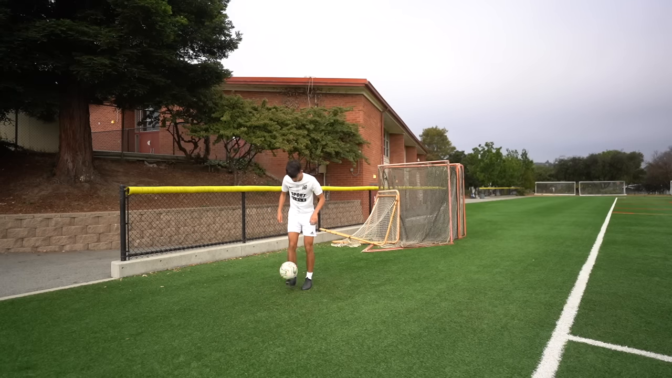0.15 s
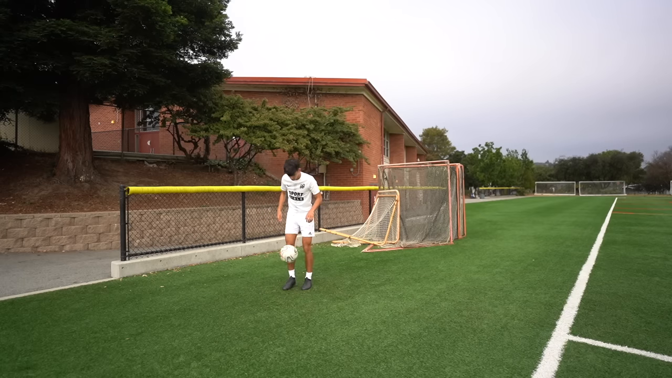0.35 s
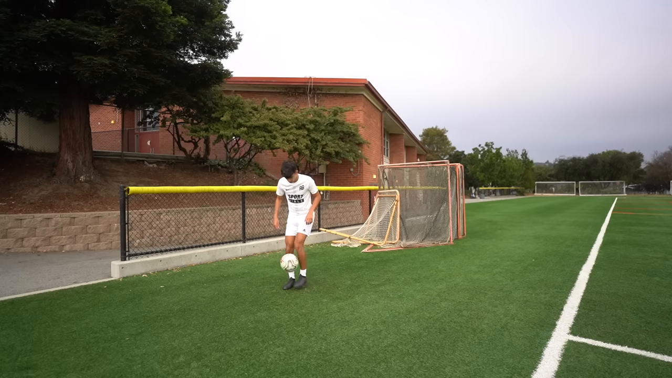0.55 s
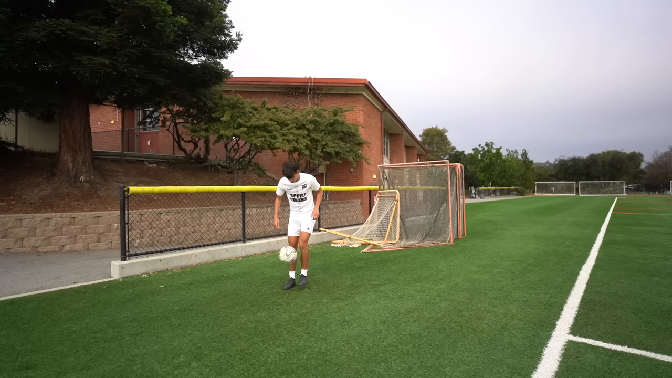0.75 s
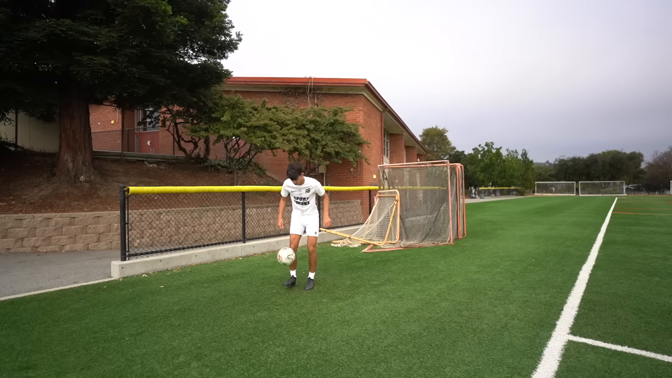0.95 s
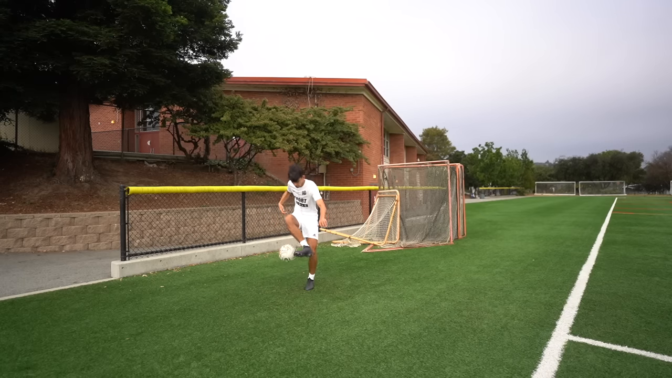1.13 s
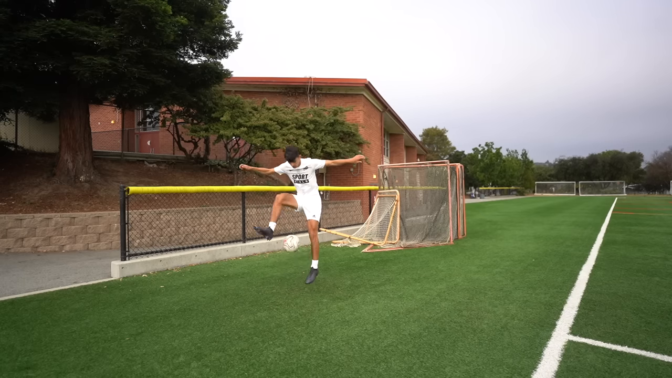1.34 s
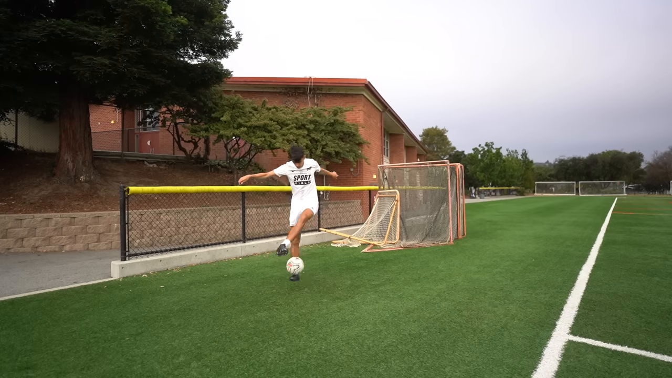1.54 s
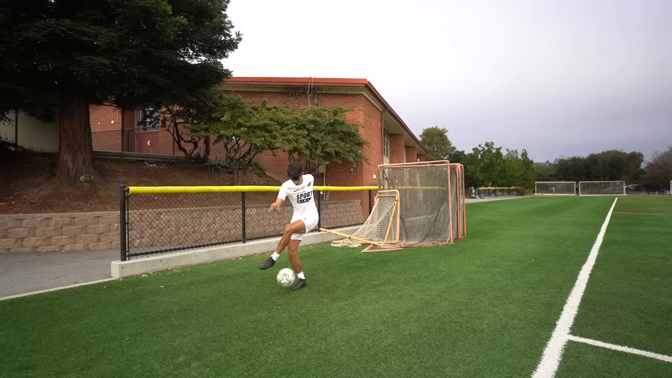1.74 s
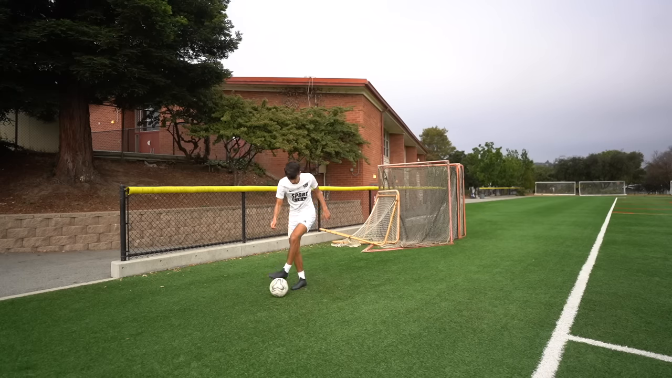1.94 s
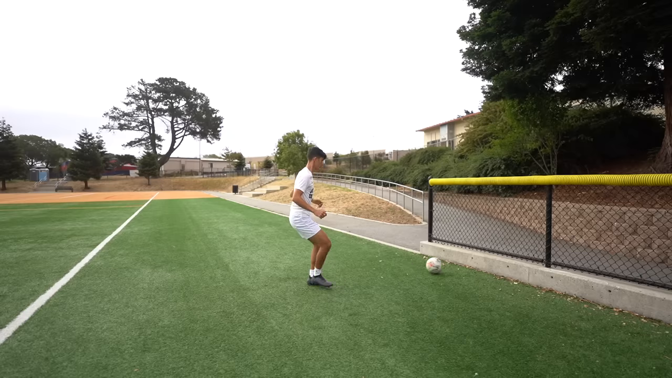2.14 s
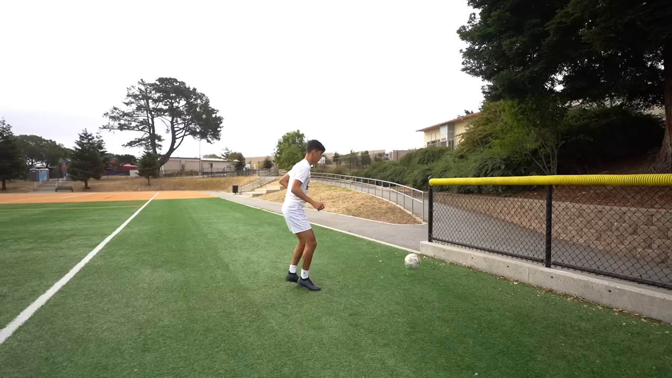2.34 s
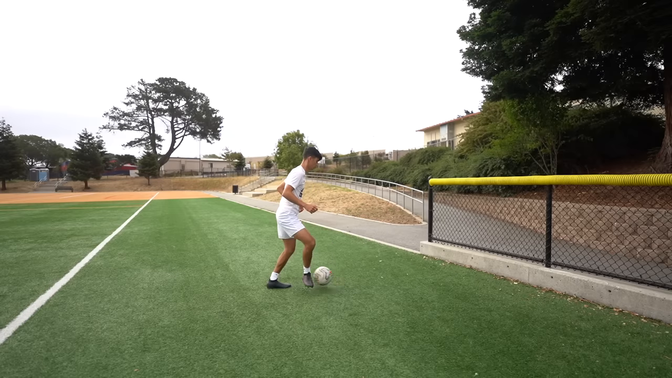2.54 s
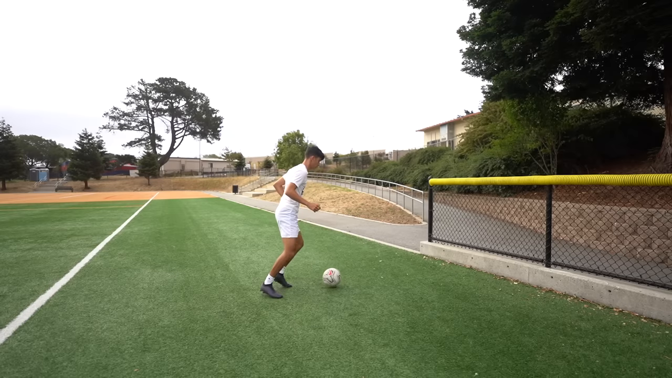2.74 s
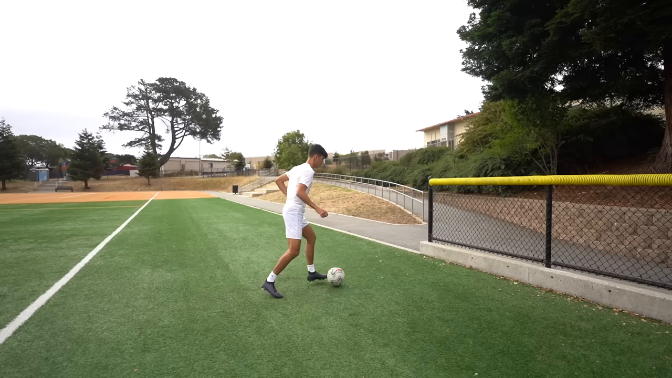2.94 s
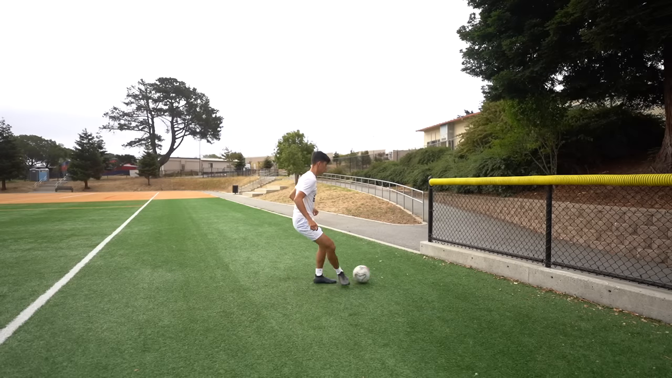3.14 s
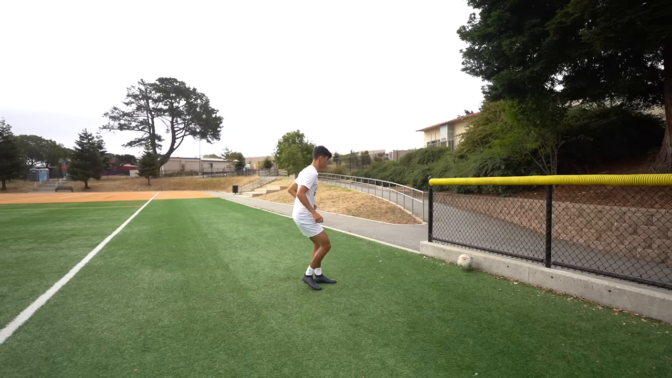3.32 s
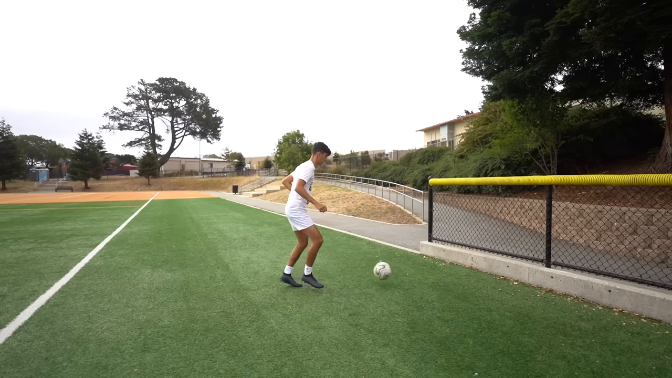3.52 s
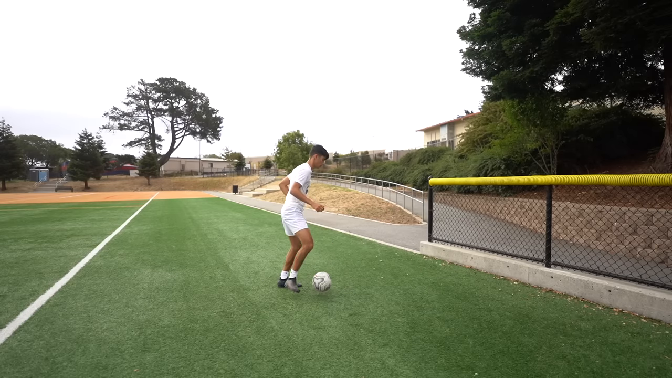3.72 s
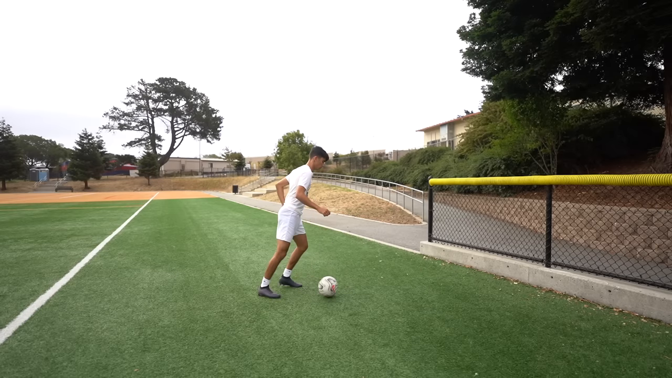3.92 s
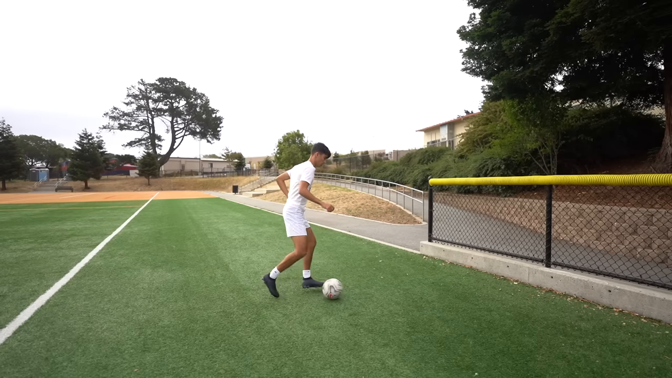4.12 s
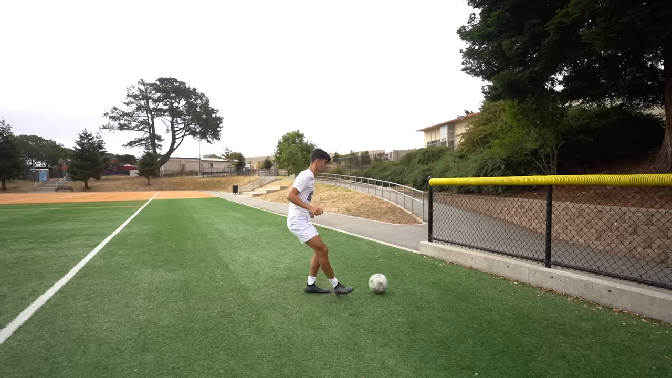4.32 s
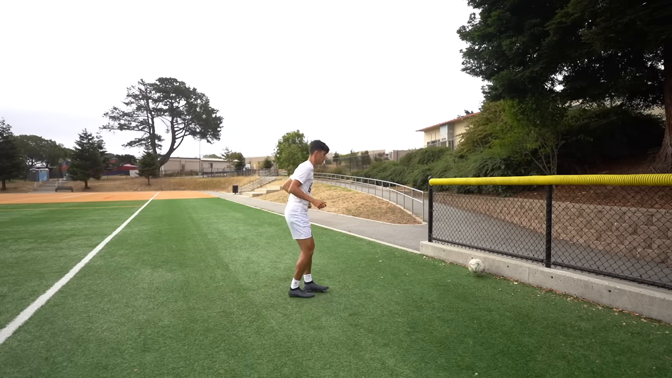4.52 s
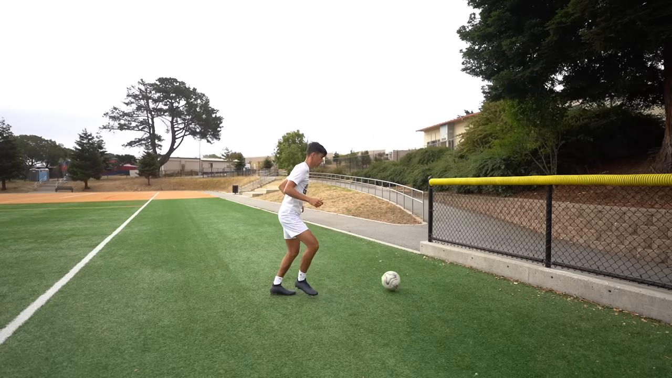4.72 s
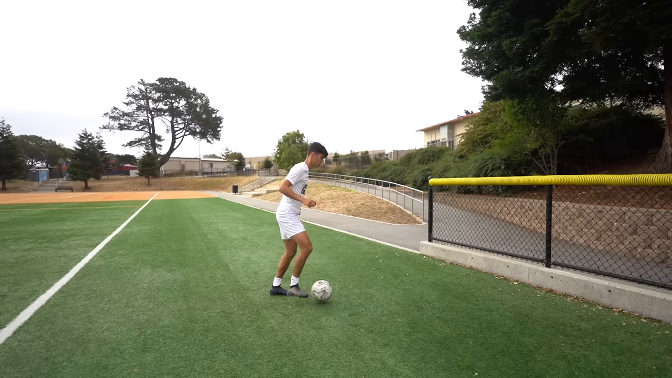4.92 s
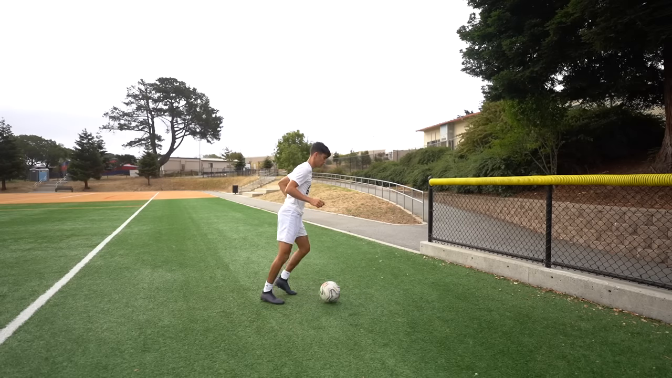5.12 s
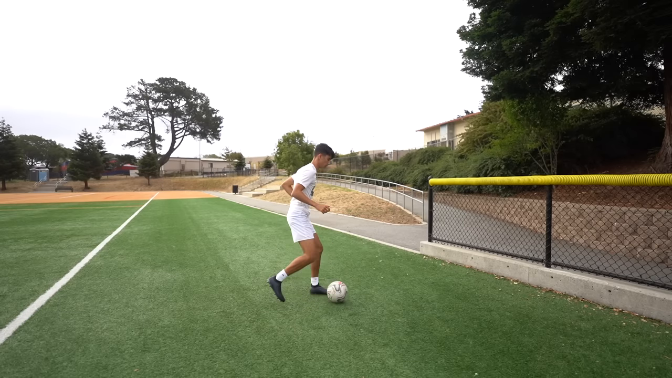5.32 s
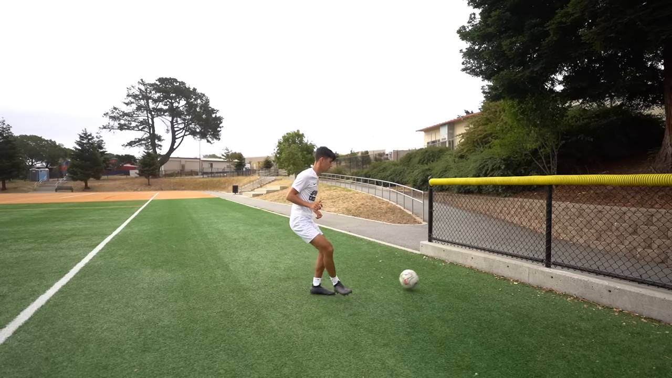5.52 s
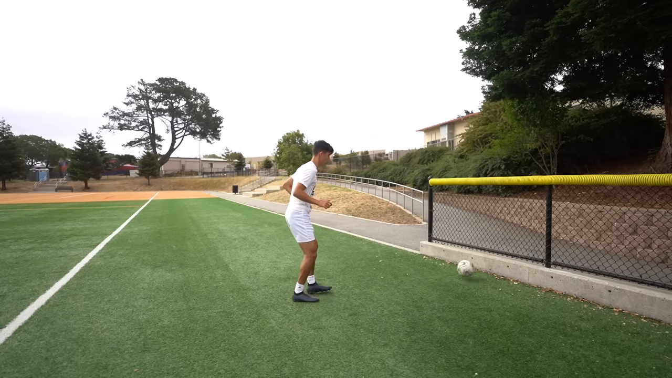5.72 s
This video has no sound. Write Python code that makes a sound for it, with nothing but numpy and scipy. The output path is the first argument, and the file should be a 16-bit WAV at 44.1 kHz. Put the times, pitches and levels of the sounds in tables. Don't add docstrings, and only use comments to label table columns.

```python
import sys
import numpy as np
from scipy import signal
from scipy.io import wavfile
from scipy.ndimage import uniform_filter1d

SR = 44100
rng = np.random.default_rng(int(sys.argv[2]) if len(sys.argv) > 2 else 0)


def magnitude_from_level(level_db):
    exponent = np.asarray(level_db, float) / 20
    return 10 ** exponent


def int16_out(signal):
    q = np.round(np.clip(np.atleast_2d(signal).T, -1, 1) * 32767)
    wavfile.write(sys.argv[1], SR, q.astype(np.int16))


N = 258426
TIME = np.arange(N) / SR
CUT_S = 2.105


def juggled_ball():
    # start_s, crack_peak_db, thump_db, upper_modes_db (re crack), treble_db (re crack)
    taps = [
        (0.226, -23, -30, -10.5, -25),
        (0.676, -19, -30.5, -17.5, -17),
        (1.1043, -16.5, -36, -15, -42),
        (1.6677, -25, -39, -16, -13),
        (1.8956, -34.5, -35, -8, -18),
    ]
    # pitch_hz, level_db, t60_s
    tap_modes = [(1400, -16, 0.0025), (2060, -7, 0.0063), (3700, -2.5, 0.003), (4900, 1, 0.0008)]
    return strikes(taps, tap_modes, pan_db=-1.5, left_late_s=0, right_late_s=0.0003,
                   stiff=1.88, rebound=0.39, rebound_s=0.015, echo_s=0.012, echo_db=-35, wall_s=0.02, wall_db=-18,
                   rattle_db=-18.5, tail_db=-33.5, fence_db=-66, knock_db=-2)


def booted_ball():
    # start_s, crack_peak_db, thump_db, upper_modes_db (re crack), treble_db (re crack)
    kicks = [
        (2.615, -14.5, -25, -11.5, -17),
        (3.1757, -13, -19, -8.5, -8.5),
        (3.7193, -15.5, -24.5, -10.5, -6),
        (4.3322, -16.5, -17, -6, -0.5),
        (4.9312, -13.5, -23, -12, -13),
        (5.4929, -11.5, -20.5, -22, -8.5),
    ]
    # pitch_hz, level_db, t60_s
    kick_modes = [(1620, -13, 0.0045), (2175, 5, 0.003), (3090, -2.5, 0.0087), (5000, -5.5, 0.0059),
                  (5800, 2.5, 0.00062)]
    return strikes(kicks, kick_modes, pan_db=-3.5, left_late_s=0, right_late_s=0.00058,
                   stiff=1.086, rebound=0.95, rebound_s=0.0056, echo_s=0.0105, echo_db=-11, wall_s=0.01615, wall_db=-13,
                   rattle_db=-19, tail_db=-31, fence_db=-70, knock_db=-2.5)


def kerbed_ball():
    # start_s, crack_peak_db, thump_db, upper_modes_db (re crack), treble_db (re crack)
    bounces = [
        (2.2677, -12, -16, -6.5, -28),
        (3.3753, -12, -16, -12.5, -8.5),
        (4.565, -14, -16, -3, -13.5),
        (5.7329, -13, -16, -7, -8),
    ]
    # pitch_hz, level_db, t60_s
    bounce_modes = [(1680, -20.5, 0.0058), (2250, 0, 0.0057), (3360, -17.5, 0.0017), (3930, -27, 0.017)]
    return strikes(bounces, bounce_modes, pan_db=-12, left_late_s=0.00012, right_late_s=0.00019,
                   stiff=1.108, rebound=0.91, rebound_s=0.0043, echo_s=0.0085, echo_db=-12.5, wall_s=0.018, wall_db=-14.5,
                   rattle_db=-18, tail_db=-28, fence_db=-36.5, knock_db=-4.5)


def strikes(table, modes, pan_db, left_late_s, right_late_s, stiff, rebound, rebound_s, echo_s, echo_db,
            wall_s, wall_db, rattle_db, tail_db, fence_db, knock_db):
    # start_s, shell_hz, main_panel_hz, upper_panel_hz, ground_echo_notch_hz
    colour = [(0.224, 113, 1330, 3350, 2400), (0.676, 123, 1260, 2650, 3700),
              (1.103, 115, 1720, 5400, 2820), (1.667, 114, 1620, 3400, 2600),
              (1.893, 114, 1680, 2800, 3560), (2.266, 116.6, 1800, 3470, 5400),
              (2.614, 112, 2590, 4730, 3560), (3.176, 107.2, 1680, 5700, 8000),
              (3.374, 122, 1690, 2880, 4540), (3.717, 119, 1720, 5650, 7100),
              (4.33, 109.4, 1790, 3050, 10800), (4.563, 130, 1470, 3700, 8900),
              (4.93, 117, 1800, 3780, 3520), (5.492, 110.6, 1630, 2700, 7100),
              (5.731, 129, 2220, 4800, 8700)]
    out, t = np.zeros((2, N)), TIME[:SR // 4]
    for s, crack_db, thump_db, upper_db, treble_db in table:
        noise = rng.standard_normal((3, len(t)))
        noise = noise[0] + 0.29 * noise[1:]
        _, shell_hz, main_hz, upper_hz, ground_hz = min(colour, key=lambda row: abs(row[0] - s))

        struck_modes = [*modes, (main_hz, -2, 0.008), (upper_hz, -3, 0.005)]
        panels = ring(struck_modes, t, upper_db + 9).sum(axis=0)
        buckle = magnitude_from_level(upper_db) * burst(band(noise, 1630, 4550), t, decay_s=0.0024)
        snap = magnitude_from_level(treble_db + 6) * burst(band(noise, 3640, 11100), t, decay_s=0.00034)
        rough = unit(cut_top(band(rng.standard_normal((2, len(t))), 830, 4100, order=1)))
        smear = magnitude_from_level(echo_db) * late(np.exp(-t / 0.00075), echo_s)
        smear = smear + magnitude_from_level(rattle_db) * np.exp(-t / 0.0048) + magnitude_from_level(tail_db) * np.exp(-t / 0.042)
        fence = magnitude_from_level(fence_db) * fence_wire(t)
        crack = magnitude_from_level(crack_db) * pan(panels + buckle + snap + rough * smear + fence, pan_db)
        crack = band(crack, 1350, 16500, order=3)
        crack = crack - ground_cancelled(crack, ground_hz)
        add(out, np.array([late(crack[0], left_late_s), crack[1]]), s + 0.00064)

        knock = unit(band(noise, 258, 640, order=3)) * (1 - np.exp(-t / 0.0019)) * np.exp(-t / 0.0095)
        add(out, magnitude_from_level(thump_db + knock_db) * pan(knock, pan_db / 2), s)

        thump = shell_thump(t, stiff * shell_hz, rebound, rebound_s, right_late_s, pan_db)
        for ch in (0, 1):
            walled = thump[ch] + magnitude_from_level(wall_db) * late(thump[ch], wall_s)
            add(out[ch:ch + 1], magnitude_from_level(thump_db + 9.5) * walled[None], s + 0.00082)
    return out


def ring(modes, t, upper_db):
    hz, db, t60 = np.transpose(modes)[:, :, None]
    chance = rng.standard_normal((2, len(modes), 1))
    db = db + 1.5 * chance[1] + upper_db * (hz * (1 + 0.02 * chance[0]) > 2600) * 0 + upper_db * (hz > 2600)
    hz = hz * (1 + 0.02 * chance[0])
    return np.sin(2 * np.pi * hz * t) * np.exp(-np.log(1000) * t / t60) * magnitude_from_level(db)


def fence_wire(t):
    # pitch_hz, level_db, t60_s
    wire_modes = [(3096, 0, .9), (3113, -7, .6)]
    wire = 0
    for hz, db, t60 in wire_modes:
        tone = np.sin(2 * np.pi * (hz * t + rng.random((2, 1))))
        wire = wire + magnitude_from_level(db) * tone * np.exp(-np.log(1000) * t / t60)
    return wire * (1 - np.exp(-t / 0.015)) * np.cos(2 * np.pi * t)


def ground_cancelled(crack, ground_hz):
    return 0.9 * signal.lfilter(*signal.iirpeak(ground_hz, ground_hz / 950, fs=SR), crack)


def shell_thump(t, squash_hz, rebound, rebound_s, right_late_s, pan_db):
    turn = squash_hz * t
    squash = -np.cos(2 * np.pi * turn) * np.where(turn < 0.25, 0.6 * np.minimum(turn / 0.11, 1), 0.8)
    squash = np.where(turn > 0.75, 1.25, 1) * squash * (turn < 1.25)
    leave = rebound * np.sin(np.pi * np.clip(t / rebound_s, 0, 1)) ** 2.33
    settle = -0.28 * late(np.sin(2 * np.pi * 0.8 * turn) * np.exp(-t / 0.0016), rebound_s)
    sides = []
    for side, side_late_s in ((-1, 0), (1, right_late_s)):
        back = late(leave * magnitude_from_level(-side * pan_db * 0.41) + settle, 1.26 / squash_hz + side_late_s)
        sides.append(uniform_filter1d(squash + back, size=25))
    return sides


def turf():
    # centre_s, length_s, fibre_hiss_db, infill_crunch_db
    hops = [
        (0, 0.0059, -43, -40),
        (0.262, 0.02, -66, -66),
        (0.432, 0.022, -60, -46.5),
        (.864, 0.017, -58.5, -52),
        (1.665, 0.043, -53, -44),
        (1.892, 0.032, -52, -54),
    ]
    steps = [(2.115, 0.034, -55.5, -65), (2.446, 0.04, -50, -41), (2.537, .008, -52, -46),
             (2.553, 0.022, -41, -41), (2.774, 0.024, -51.5, -46), (3.083, 0.065, -54.5, -68),
             (3.572, 0.037, -47.5, -35.5), (3.661, 0.022, -38, -33.5), (3.863, 0.056, -55, -51),
             (4.245, 0.056, -52, -45), (4.531, 0.077, -40, -35.5), (4.722, 0.034, -55, -36),
             (4.919, .007, -46, -73), (5.104, 0.035, -53, -42), (5.23, 0.037, -56, -49),
             (5.375, 0.05, -54, -46), (5.714, 0.048, -47.5, -40)]
    skids = [
        (2.171, 0.062, -46.5, -42.5),
        (2.273, 0.1, -50, -45),
        (3.363, 0.072, -42.5, -44),
        (3.469, 0.019, -50, -44),
        (4.762, 0.046, -47, -40.5),
        (5.66, 0.044, -42, -50),
    ]
    hiss, crunch, air = np.zeros((3, 2, N))
    for rows, pan_db, air_db in ((hops, 4, -16), (steps, -3.5, -9), (skids, -9.5, -6.5)):
        for s, length, hiss_db, crunch_db in rows:
            sweep = np.linspace(0, 1, int(1.5 * length * SR)) ** 0.62
            shape = pan(np.sin(np.pi * sweep) ** 2, pan_db)
            add(hiss, magnitude_from_level(hiss_db) * shape, max(s - 0.57 * length, 0))
            add(air, magnitude_from_level(hiss_db + air_db) * shape, max(s - 0.73 * length, 0))
            add(crunch, magnitude_from_level(crunch_db) * shape, max(s - 0.55 * length, 0))
    grit = band(fibres(1200), 273, 800) + 0.26 * band(fibres(2500), 550, 2330)
    brushed = hiss * unit(band(fibres(5500), 2100, 8000, order=1))
    rolled = rolling() * unit(band(fibres(6000), 800, 7000, order=1))
    tips = air * unit(band(fibres(7000), 7100, 19000))
    infill = crunch * unit(1.25 * grit[0] + 0.5 * grit)
    return brushed + rolled + tips + infill


def rolling():
    # start_s, time_at_speed_s, hiss_db
    rolls = [
        (2.285, .005, -55),
        (2.7, .12, -73),
        (3.2, 0.08, -47),
        (3.39, .005, -52),
        (3.6, .15, -68),
        (4.35, 0.095, -45.5),
        (4.59, .012, -53.5),
        (4.955, .005, -75),
        (5.515, .005, -52),
        (5.75, .012, -54),
    ]
    level = magnitude_from_level(-63) * (TIME > CUT_S)
    for s, hold_s, db in rolls:
        level = level + swell(s, hold_s, db, rise_db_s=1200, fade_db_s=158)
    return pan(level * magnitude_from_level(walk(60)), -8)


def fibres(grains_per_s):
    snaps = (rng.random((2, N)) < grains_per_s / SR) * rng.standard_normal((2, N))
    snaps = snaps * magnitude_from_level(1.5 * rng.exponential(size=(2, N)))
    return unit(snaps) + 0.52 * rng.standard_normal((2, N))


def wind():
    # start_s, hold_s, buffet_db, upper_eddies_db (re buffet)
    gusts = [(0, 0.049, -14.5, -14), (0.086, 0.053, -20, -2), (0.187, 0.045, -29, -18),
             (0.673, .11, -35, -34), (0.885, 0.012, -29.5, -12), (1.138, 0.023, -19.5, -11.5),
             (1.527, 0.017, -27.5, -23), (1.651, 0.044, -32, -2.5), (1.809, 0.011, -16.5, -35),
             (1.902, 0.01, -13, -22.5), (1.97, .055, -20.5, -49), (2.052, 0.0085, -28.5, -2),
             (2.084, .03, -25, -34)]
    # start_s, peak_db, pitch_hz
    eddies = [(0.024, -15, 214), (0.056, -13.5, 134), (0.064, -13, 94), (0.086, -9, 108), (0.106, -12, 205),
              (0.113, -24, 560), (0.125, -10.5, 135), (0.136, -23, 447), (0.174, -18, 128),
              (0.242, -12, 104), (0.579, -23.5, 67), (0.716, -24.5, 94), (0.867, -21, 142),
              (1.136, -16, 121), (1.153, -11, 141), (1.494, -22, 139), (1.62, -18, 142),
              (1.624, -23.5, 420), (1.653, -22.5, 204), (1.702, -21, 160), (1.813, -15.5, 98),
              (1.878, -14, 133), (1.902, -14, 112.5), (1.92, -16, 99.6), (2.034, -11, 104),
              (2.049, -15, 88), (2.064, -14.5, 73), (2.084, -15.5, 184)]
    buffet, upper = magnitude_from_level(-32), magnitude_from_level(-64.5)
    for s, hold_s, db, up_db in gusts:
        buffet = buffet + swell(s, hold_s, db, rise_db_s=352, fade_db_s=189)
        upper = upper + swell(s, hold_s, db + up_db, rise_db_s=352, fade_db_s=558)
    small = (rng.random((3, N)) < 500 / SR) * rng.standard_normal((3, N))
    ports = np.array([small[0], late(small[0], 0.00079)]) + 0.5 * small[1:]
    low = band(ports, 59.3, 140) + magnitude_from_level(-7.5) * band(ports, 26, 40)
    high = band(band(ports, 160, 355), 180, 770) + magnitude_from_level(-20.5) * band(ports, 640, 870)
    out = magnitude_from_level(-7) * buffet * even(low) + magnitude_from_level(3) * upper * even(high)
    for s, peak_db, hz in eddies:
        turn = hz * TIME[:int(2 * SR / hz)]
        eddy = np.hanning(len(turn)) * np.cos(2 * np.pi * (turn + rng.random() / 4))
        eddy = rng.choice([-1, 1]) * eddy
        add(out, magnitude_from_level(peak_db + 1.5) * pan(np.array([eddy, late(eddy, 0.00065)]), -0.5), s)
    return out * (TIME < CUT_S)


def even(x):
    return x / np.sqrt(uniform_filter1d(np.mean(x ** 2, axis=0), size=2200) + 1e-12)


def town():
    # pitch_hz, level_db (per Hz)
    spectra = [
        [(15, -33), (25, -3), (53, 4.5), (114, -23.5), (263, -6), (326, -21), (714, -18.5), (962, -22.5),
         (1400, -23.5), (3340, -39.5), (5000, -40.5), (13600, -54), (16000, -40)],
        [(15, -48), (25, -8.5), (76, 3), (137, -1.5), (195, -1), (301, -16), (335, -5), (405, -14),
         (476, -12.5), (1100, -18), (2000, -24.5), (13600, -48.5), (16000, -40)],
    ]
    # time_s, level_db
    town_level = [(0, -36), (.15, -41), (.3, -36.5), (1.0, -35), (1.6, -34), (1.8, -31.5), (2.1, -36.5),
                  (2.11, -36), (5.86, -34)]
    # pitch_hz, correlation
    likeness = [(60, 1.0), (290, 0.97), (640, 0.62), (1410, 0.05), (3100, 0.02), (6820, 0.023)]
    # pitch_hz, left_minus_right_db
    balance = [(60, 2.5), (110, -0.5), (200, -2), (380, -3.5), (700, -4.5), (1290, -8), (2380, -7),
               (4400, -5), (8120, -0.5), (15000, -1)]
    before, after, drift = 0, 0, walk(1)
    for hz in 28 * 2 ** np.arange(0, 9.3, 0.5):
        mid, side = band(rng.standard_normal((2, N)), hz / 2 ** 0.25, hz * 2 ** 0.25)
        like = np.clip(at_pitch(likeness, hz), 0, 1)
        pair = np.sqrt(1 + like) * mid + np.sqrt(1 - like) * side * np.array([[1], [-1]])
        flicker_db = 2.6 if hz < 300 else 1.1
        pair = pair * magnitude_from_level(0.7 * drift + flicker_db * walk(11))
        before = before + magnitude_from_level(at_pitch(spectra[0], hz)) * pair
        after = after + magnitude_from_level(at_pitch(spectra[1], hz)) * pan(pair, at_pitch(balance, hz))
    return np.where(TIME > CUT_S, unit(after), unit(before)) * magnitude_from_level(np.interp(TIME, *np.transpose(town_level)))


def at_pitch(table, hz):
    table_hz, value = np.transpose(table)
    return np.interp(np.log(hz), np.log(table_hz), value)


def unit(x):
    return x / np.sqrt(np.mean(x ** 2))


def band(x, lo_hz, hi_hz, order=2):
    edges_hz = [lo_hz, min(hi_hz, 0.45 * SR)]
    return signal.sosfilt(signal.butter(order, edges_hz, "band", fs=SR, output="sos"), x)


def cut_top(x):
    return signal.sosfilt(signal.ellip(8, 0.2, 50, 15800, fs=SR, output="sos"), x)


def burst(x, t, decay_s):
    fall = np.exp(-t / decay_s)
    return unit(x * fall) * np.sqrt(np.mean(fall ** 2))


def swell(start_s, hold_s, db, rise_db_s, fade_db_s):
    rise = rise_db_s * np.maximum(start_s - TIME, 0)
    fade = fade_db_s * np.maximum(TIME - start_s - hold_s, 0)
    return magnitude_from_level(db - rise - fade)


def walk(rate):
    k = int(SR / rate)
    held = np.repeat(rng.standard_normal(N // k + 1), k)
    return unit(uniform_filter1d(uniform_filter1d(held, k), k)[:N])


def pan(x, pan_db):
    return x * magnitude_from_level(np.array([pan_db, -pan_db]).reshape(2, -1) / 2)


def late(x, s):
    return np.pad(x, (int(max(s, 0) * SR), 0))[:len(x)]


def add(out, x, s):
    i = int(s * SR)
    out[:, i:i + x.shape[1]] += x[:, :N - i]


def scene():
    ball = juggled_ball() + booted_ball() + kerbed_ball()
    release = 1 / (0.09 * SR)
    held = signal.lfilter([release], [1, release - 1], abs(ball).max(axis=0))
    steady = turf() + town() / (1 + 11 * held)
    return ball + wind() + cut_top(steady)


def low_pass(x):
    return signal.sosfilt(signal.butter(12, 16670, fs=SR, output="sos"), x)


def record(dry):
    heard = signal.sosfilt(signal.butter(1, 30, "high", fs=SR, output="sos"), dry)
    return low_pass(np.clip(heard, -0.98, 0.98))


dry = scene()
out = record(dry)
int16_out(out)
```